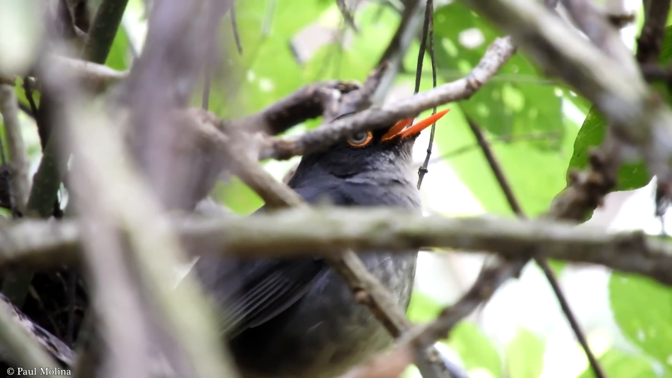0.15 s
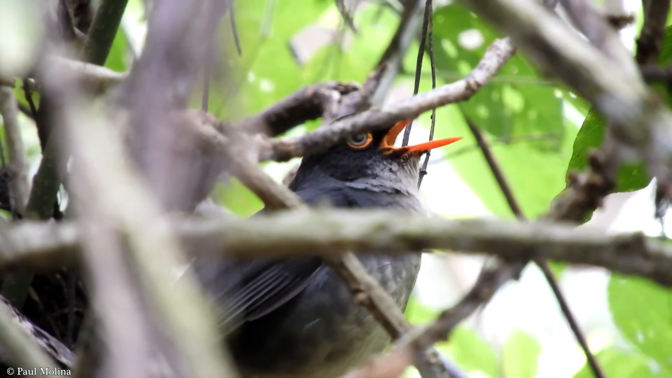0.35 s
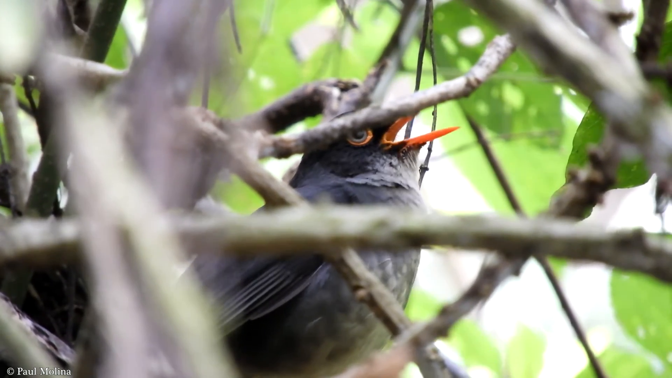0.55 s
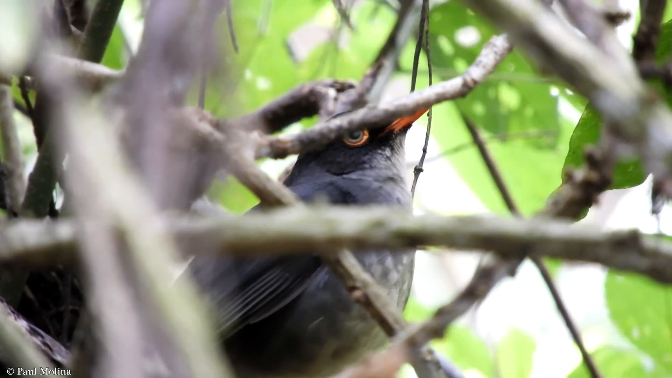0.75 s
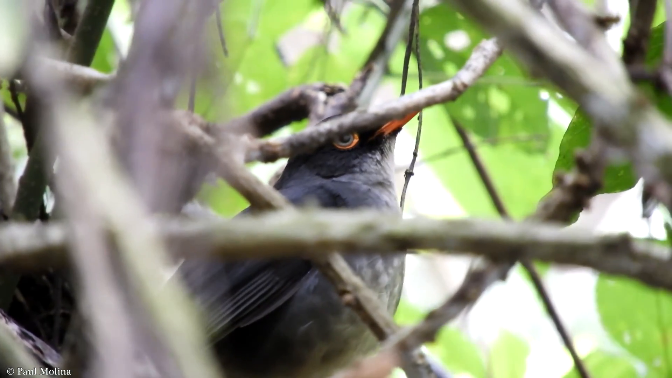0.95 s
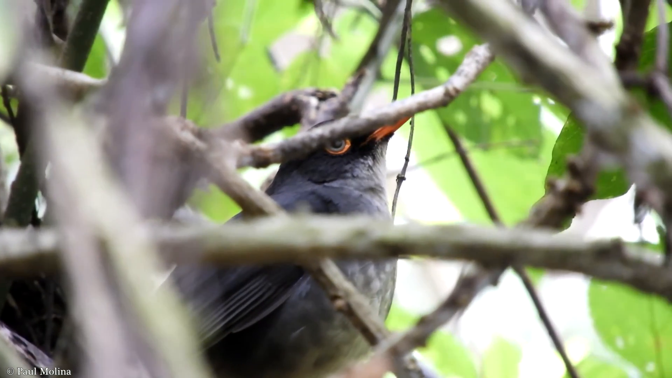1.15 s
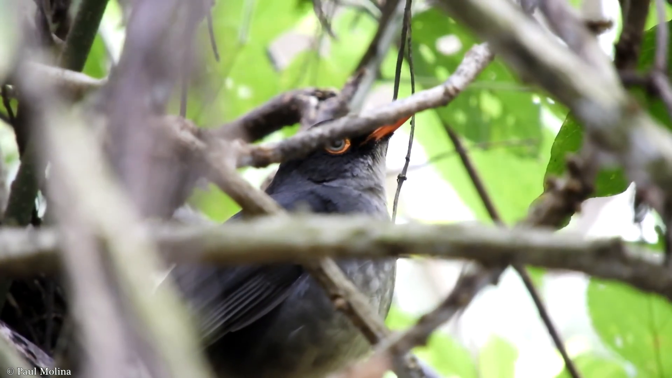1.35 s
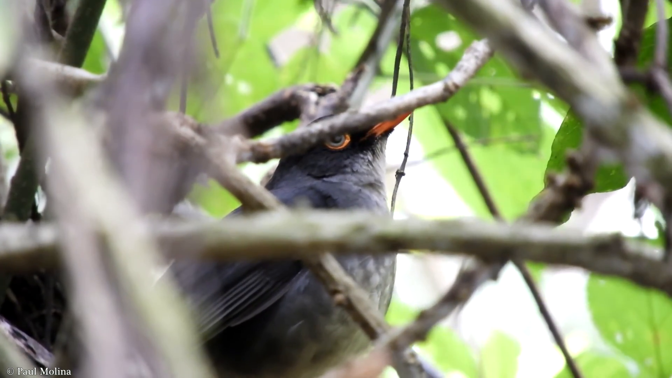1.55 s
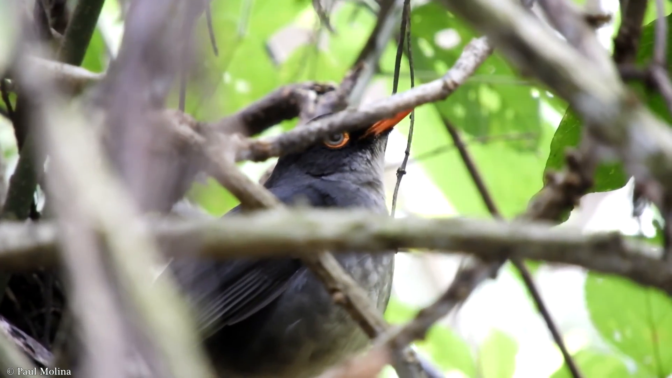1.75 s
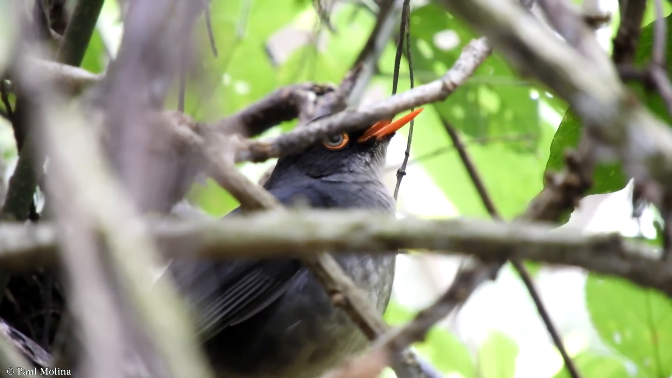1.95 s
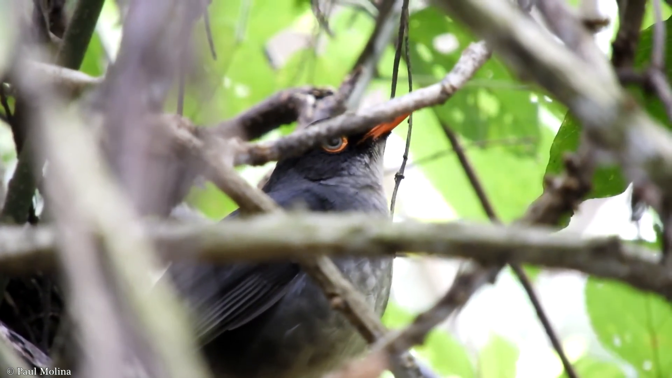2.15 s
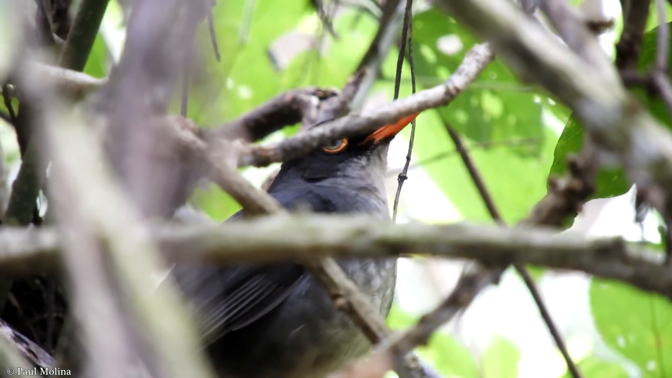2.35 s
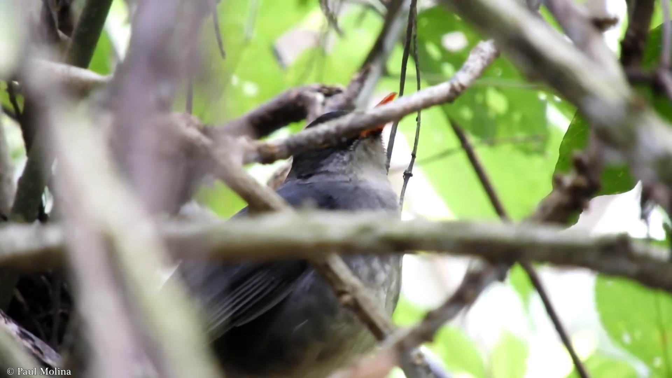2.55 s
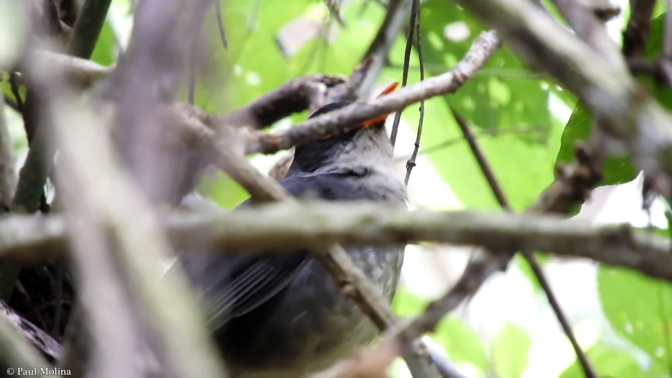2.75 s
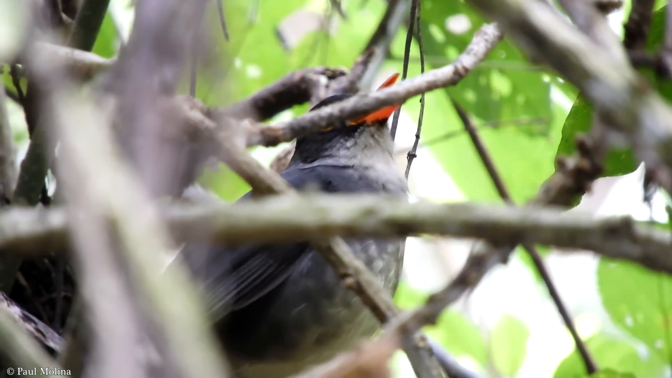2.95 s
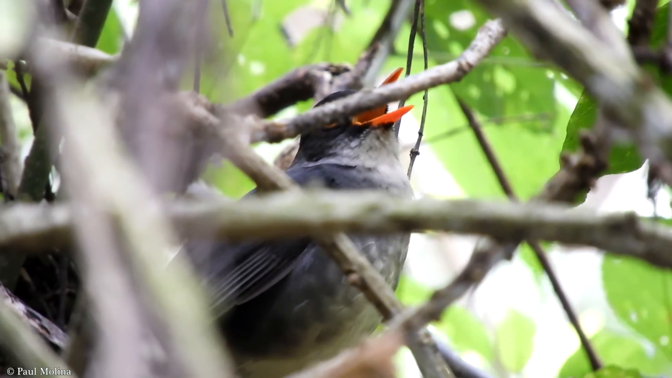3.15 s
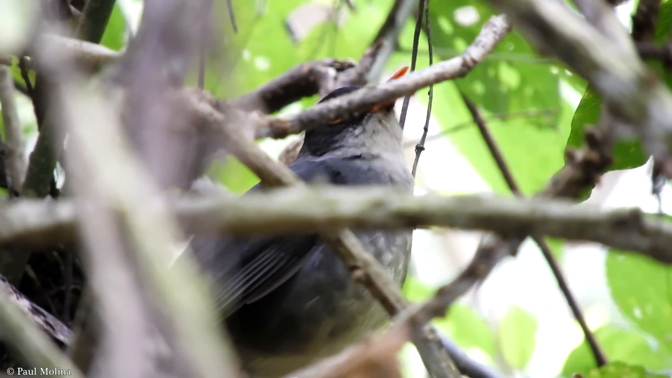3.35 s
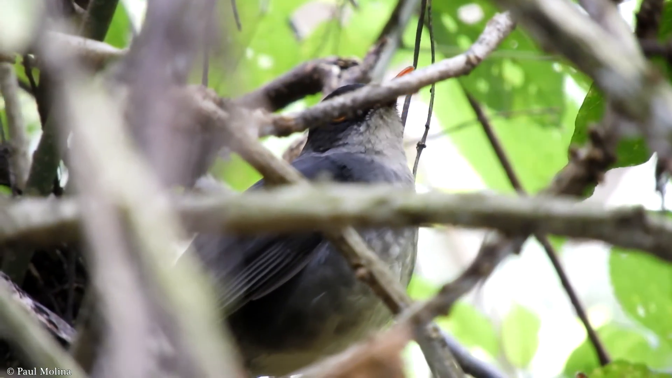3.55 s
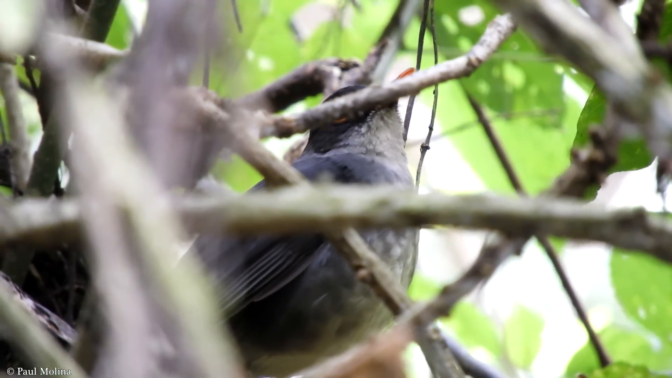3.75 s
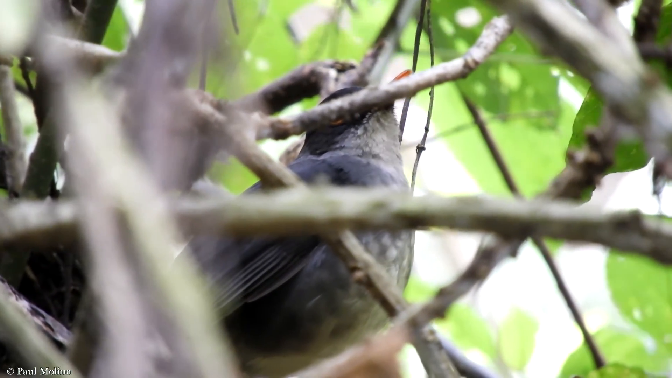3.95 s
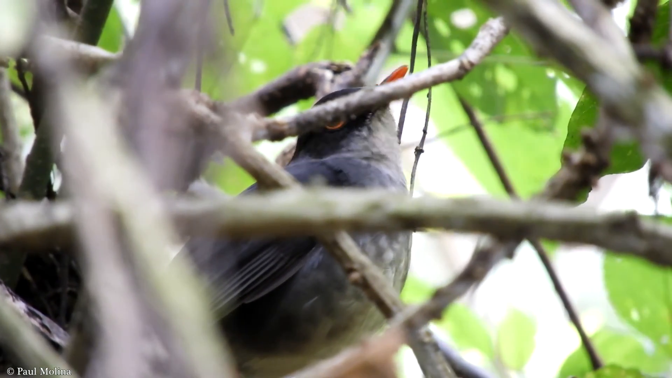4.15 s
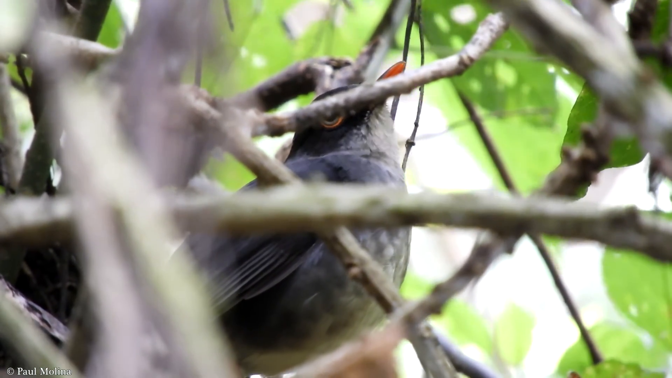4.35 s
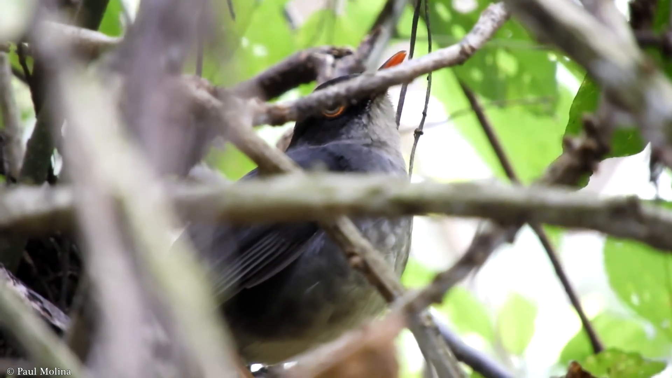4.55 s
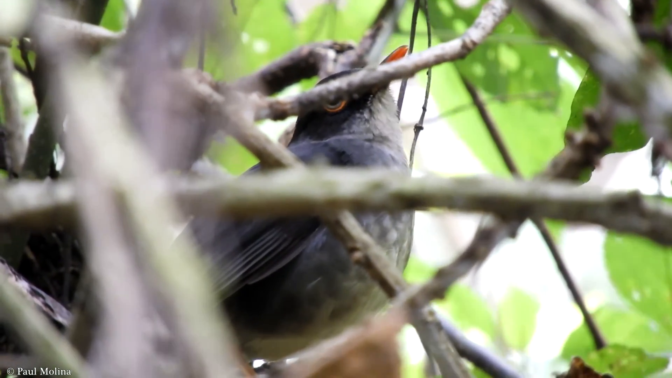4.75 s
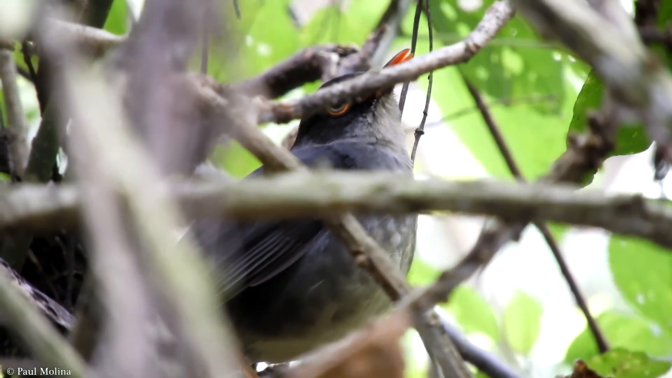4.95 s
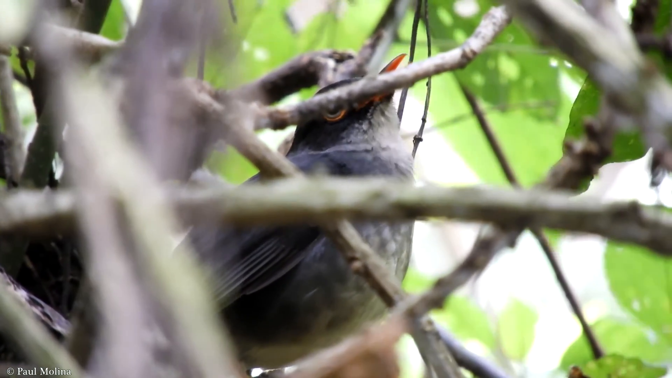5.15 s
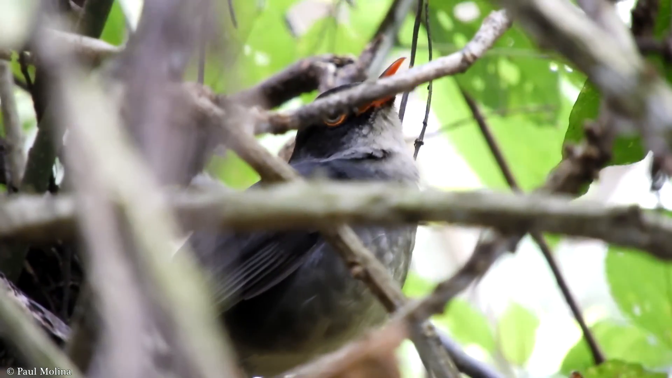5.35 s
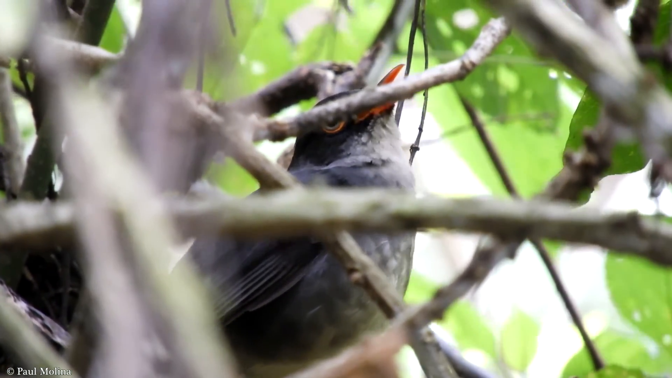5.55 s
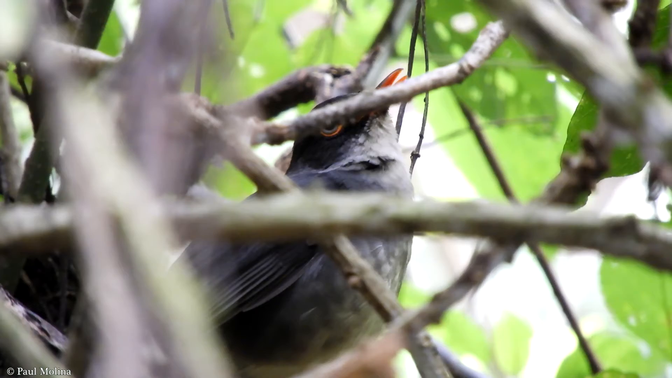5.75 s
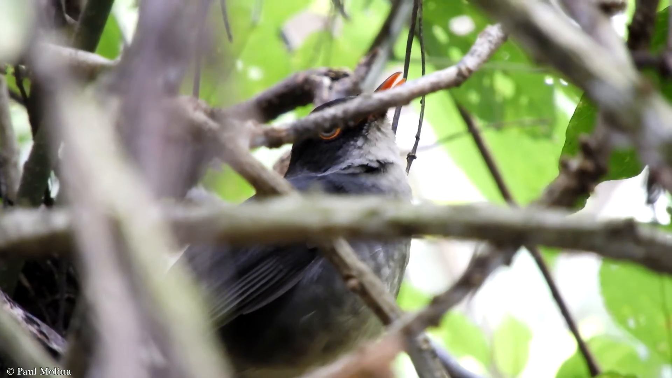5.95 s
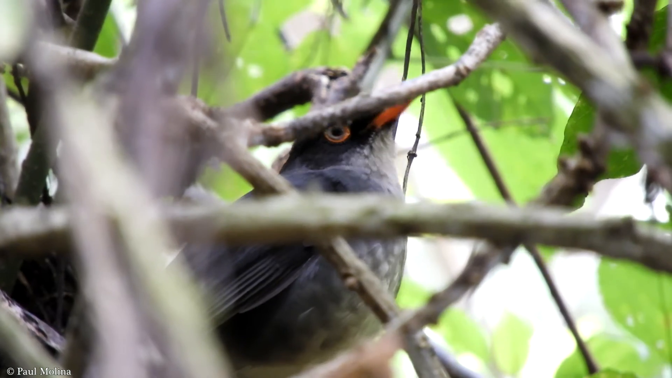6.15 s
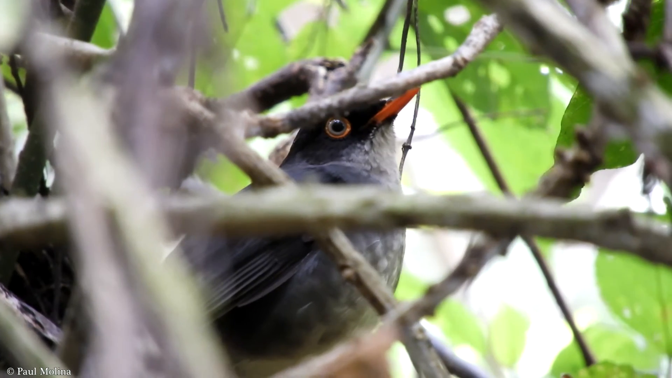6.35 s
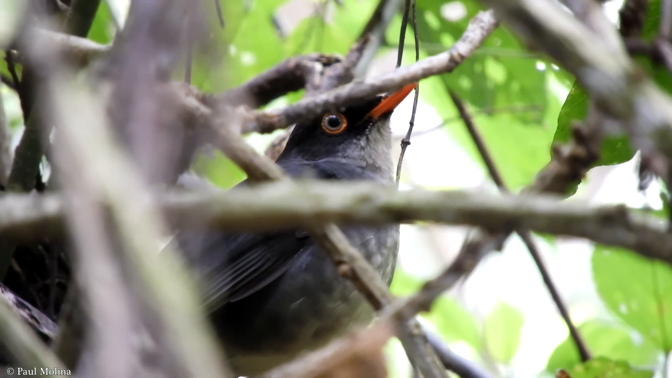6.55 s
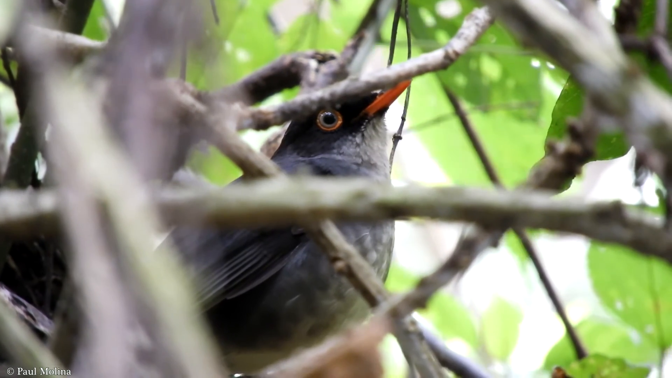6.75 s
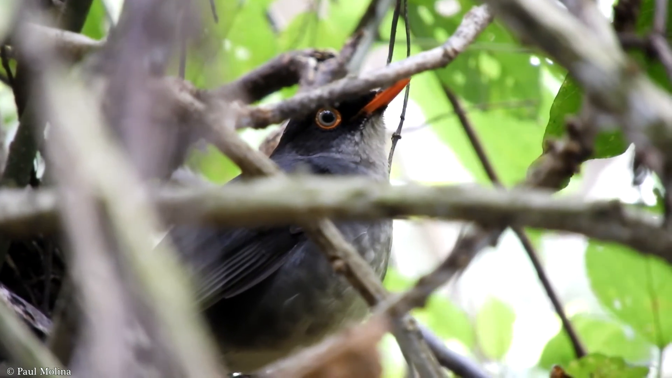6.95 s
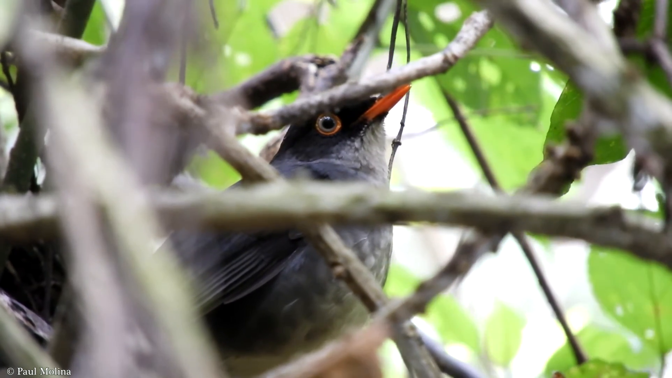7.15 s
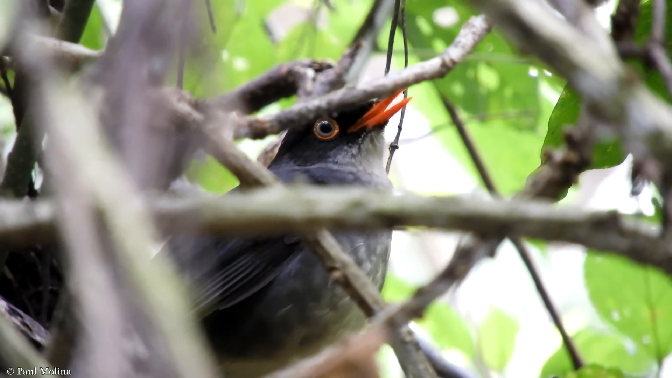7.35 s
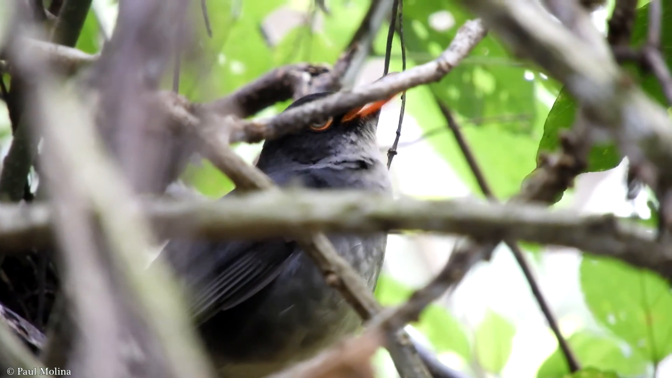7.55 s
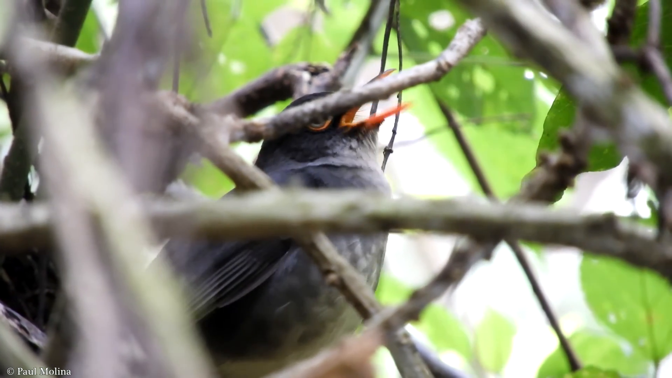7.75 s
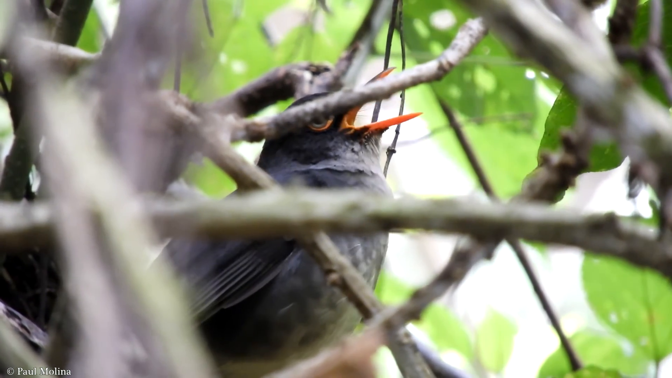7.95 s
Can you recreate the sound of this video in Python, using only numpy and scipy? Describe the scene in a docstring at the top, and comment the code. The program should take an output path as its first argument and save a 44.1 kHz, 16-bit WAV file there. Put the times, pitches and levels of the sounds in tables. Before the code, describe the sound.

Outdoor close recording of one songbird among branches, with short woody echoes and constant hiss. Three similar phrases come several seconds apart: brief pip, two scooping chirps, then a loud clear whistle, surging and dipping. Between them are faint ticks, soft irregular knocks, thin hoarse calls from far birds, and a quiet run of lower, mellow whistles before the last phrase.

```python
"""A thrush sings from a bush close to the microphone: a pip, two rising chirps and a long, nearly pure whistle,
while small birds slur and wheeze deeper in the forest. Dry ticks follow, and dull taps fall throughout.
A second phrase comes, the far birds call again, then soft low notes fill the pause before a third phrase.
Notes are unsteady sines, wheezes and ticks are banded noise, taps are damped rings; noise echoes make the
branches and the forest's tail. Filtered noise makes the low murmur and steady hiss under it all."""
import sys
import numpy as np
from scipy import signal
from scipy.fft import rfft, irfft
from scipy.io import wavfile
from scipy.ndimage import uniform_filter1d, map_coordinates

SR = 44100
rng = np.random.default_rng(int(sys.argv[2]) if len(sys.argv) > 2 else 0)


def persist_wave(psi):
    """Save psi, clipped to +-1, as 16-bit WAV."""
    counts = np.round(np.clip(psi, -1, 1) * 32767).astype(np.int16)
    wavfile.write(sys.argv[1], SR, np.atleast_2d(counts).T)


N = 352359
TIME = np.arange(N) / SR
FREQS = np.maximum(np.fft.rfftfreq(N, 1 / SR), 1)


def undb(db):
    """Decibels to amplitude gain."""
    return 10 ** (np.asarray(db) / 20)


def pan(db):
    """Left and right gains for a left-minus-right level in dB; their mean is one."""
    gains = undb(np.array([np.atleast_1d(db), -np.atleast_1d(db)]) / 2)
    return gains / gains.mean(axis=0)


def over_freq(hz, values):
    """Join points by straight lines on a log-frequency axis."""
    return np.interp(np.log(FREQS), np.log(hz), values)


def walk(rate, size):
    """Smooth chance with a spread of about one, from `rate` random points a second."""
    steps = rng.standard_normal(int(size / SR * rate) + 4)
    return map_coordinates(steps, [np.arange(size) / SR * rate], order=2, mode="nearest")


def add(track, sound, start):
    """Mix a sound into a track from a given second on."""
    i = max(int(start * SR), 0)
    part = track[..., i:i + sound.shape[-1]]
    part += sound[..., :part.shape[-1]]


def gate(t, length, edge):
    """Rounded start and end of a note."""
    nearest_end = np.minimum(t, length - t)
    return np.sin(np.pi / 2 * np.clip(nearest_end / edge, 0, 1)) ** 2


def arch(t, length, ends_db=-4):
    """Level in dB of a note that swells to its middle and fades again."""
    return ends_db * (2 * t / length - 1) ** 2


def ring_down(t, t60):
    """Exponential decay that falls 60 dB in t60 seconds."""
    return np.exp(-np.log(1000) * t / t60)


def syrinx(hz, db, waver, flutter_db, full_db=-29, second_db=-38, third_db=-34.5):
    """A nearly pure tone, a little unsteady; overtones grow as it is blown harder, up to full_db."""
    phase = 2 * np.pi * np.cumsum(hz * (1 + waver * walk(346, len(hz)))) / SR
    size = undb(db + flutter_db * walk(64.7, len(hz)))
    effort = np.minimum(size / undb(full_db), 1)
    overtones = undb(second_db) * np.sin(2 * phase) + undb(third_db) * np.sin(3 * phase)
    below_nyquist = 3 * hz < SR / 2
    return np.sqrt(2) * size * (np.sin(phase) + effort * overtones * below_nyquist)


def tone(start, hz, db, waver, flutter_db, edge):
    """One syrinx note with rounded ends, placed in time."""
    out, t = np.zeros(N), np.arange(len(hz)) / SR
    add(out, gate(t, len(hz) / SR, edge) * syrinx(hz, db, waver, flutter_db), start)
    return out


def whistles(edge_s=0.018, pitch_window_s=0.028):
    """Long thrush whistles: a tone follows a smoothed pitch curve while its loudness surges and dips."""
    # one curve per long whistle: t/s, f/Hz, level/dB before the mix
    curves = [
        [(0.33, 3520, -44), (0.344, 3510, -39), (0.368, 3580, -28.5), (0.39, 3566, -42), (0.405, 3597, -27),
         (0.43, 3600, -20), (0.452, 3598, -24.5), (0.49, 3600, -19.5), (0.527, 3600, -26), (0.548, 3567, -24),
         (0.564, 3593, -22.5), (0.583, 3570, -26.5), (0.62, 3558, -21), (0.636, 3590, -40), (0.645, 3530, -28),
         (0.659, 3510, -44), (0.668, 3500, -36), (0.698, 3492, -26.5), (0.717, 3490, -43), (0.725, 3530, -31),
         (0.74, 3530, -50), (0.77, 3560, -48)],
        [(3.035, 3440, -39), (3.06, 3490, -30.5), (3.069, 3600, -34), (3.08, 3547, -27.5), (3.115, 3570, -23),
         (3.142, 3560, -28.5), (3.167, 3563, -22), (3.187, 3540, -30), (3.204, 3544, -21), (3.224, 3510, -38),
         (3.233, 3500, -30), (3.255, 3530, -31.5), (3.275, 3502, -35.5), (3.325, 3490, -33),
         (3.351, 3490, -21.5), (3.38, 3474, -31.5), (3.425, 3476, -31), (3.455, 3440, -50), (3.485, 3500, -41)],
        [(7.825, 3540, -47), (7.845, 3570, -37), (7.866, 3585, -37), (7.878, 3605, -26.5), (7.932, 3606, -22),
         (7.948, 3610, -25), (7.96, 3580, -22.5), (7.988, 3590, -17)],
    ]
    # among the branches the direction depends on pitch: f/Hz, left minus right level/dB
    direction = [(3520, -3.5), (3585, -7), (3602, 0)]
    out = 0
    for rows in curves:
        when, pitch, db = np.transpose(rows)
        t = np.arange(when[0], when[-1] + edge_s, 1 / SR)
        hz = uniform_filter1d(np.interp(t, when, pitch), int(pitch_window_s * SR), mode="nearest")
        sound = tone(when[0], hz, np.interp(t, when, db), waver=0.002, flutter_db=0.9, edge=edge_s)
        pitch_now = np.interp(TIME, t, hz)
        out = out + sound * pan(np.interp(pitch_now, *np.transpose(direction)))
    return out


def chirps(scoop_s=0.018):
    """Each chirp glides exponentially up to its pitch and throbs as it passes those that carry best."""
    # upward chirps: t/s, length/s, held f/Hz, scoop depth/Hz, level/dB before carry and mix
    chirp_notes = [(0.069, 0.07, 3003, 470, -33), (0.154, 0.077, 2993, 576, -32),
                   (2.785, 0.083, 3034, 736, -33), (2.88, 0.082, 2990, 650, -29.5),
                   (7.562, 0.073, 3006, 620, -31), (7.65, 0.089, 2974, 717, -29)]
    # how well each pitch carries through the branches: f/Hz, gain/dB
    carry = [(2450, -6.5), (2720, -11), (2840, 1.5), (2905, -10), (2965, 2), (3040, -1.5)]
    out = 0
    for start, length, held_hz, scoop_hz, db in chirp_notes:
        t = np.arange(int(length * SR)) / SR
        hz = held_hz - scoop_hz * np.exp(-t / scoop_s)
        level = db + np.interp(hz, *np.transpose(carry))
        out = out + tone(start, hz, level, waver=0.0032, flutter_db=0.9, edge=0.0072)
    return out


def pips():
    """A short, nearly even-pitched syrinx note opens each phrase before the chirps."""
    # opening notes: t/s, length/s, f/Hz, level/dB before the mix
    pip_notes = [(0.023, 0.033, 3090, -36), (2.746, 0.026, 3120, -36), (7.496, 0.068, 3010, -44.5)]
    out = 0
    for start, length, hz, db in pip_notes:
        steady_hz = np.full(int(length * SR), float(hz))
        out = out + tone(start, steady_hz, db, waver=0.0033, flutter_db=5.5, edge=0.01)
    return out


def soft_notes(settle_s=0.0316):
    """Quiet low whistles, beak nearly shut, that ease onto a steady pitch; some grow and some fade."""
    # soft notes: t/s, length/s, starting f/Hz, settled f/Hz, mid-note level/dB, growth over the note/dB
    low_notes = [(5.17, 0.041, 2850, 2710, -49, 0), (5.317, 0.201, 2660, 2640, -41, 3),
                 (5.517, 0.06, 2660, 2620, -43.5, 0), (5.577, 0.034, 2680, 2630, -41, 2),
                 (5.609, 0.057, 2705, 2750, -42.5, -3), (5.725, 0.14, 2340, 2200, -42.5, -5),
                 (5.974, 0.11, 2220, 2220, -44, -6)]
    out = 0
    for start, length, from_hz, held_hz, db, growth_db in low_notes:
        t = np.arange(int(length * SR)) / SR
        hz = held_hz + (from_hz - held_hz) * np.exp(-t / settle_s)
        level = db + arch(t, length) + growth_db * (t / length - 0.5)
        out = out + tone(start, hz, level, waver=0.0025, flutter_db=2.5, edge=0.0077)
    return out


def slurs():
    """Small birds' thin tones, each sliding evenly from one pitch to another."""
    # thin slurs: t/s, length/s, starting f/Hz, final f/Hz, mid-note level/dB before the mix
    slur_notes = [(0.56, 0.2, 8550, 9820, -49.5), (0.63, 0.11, 4715, 4225, -46.5),
                  (4.515, 0.055, 4660, 4280, -49)]
    out = 0
    for start, length, from_hz, to_hz, db in slur_notes:
        t = np.arange(int(length * SR)) / SR
        hz = from_hz * (to_hz / from_hz) ** (t / length)
        out = out + tone(start, hz, db + arch(t, length), waver=0.0021, flutter_db=4.5, edge=0.008)
    return out


def wheezes(width_hz=600):
    """Hoarse distant calls: a narrow band of breathy sound slides downward."""
    # falling wheezes: t/s, length/s, starting f/Hz, final f/Hz, mid-note level/dB before the mix
    hoarse_calls = [(0.51, 0.12, 5950, 4600, -49), (4.365, 0.12, 6000, 4700, -47),
                    (4.455, 0.165, 4950, 4000, -54)]
    out = np.zeros(N)
    for start, length, from_hz, to_hz, db in hoarse_calls:
        t = np.arange(int(length * SR)) / SR
        hz = from_hz * (to_hz / from_hz) ** (t / length)
        phase = 2 * np.pi * np.cumsum(hz) / SR
        # two random envelopes a quarter turn apart spread the tone into a band
        rasp = walk(width_hz, len(t)) * np.sin(phase) + walk(width_hz, len(t)) * np.cos(phase)
        add(out, undb(db + arch(t, length)) * gate(t, length, 0.0075) * rasp, start)
    return out


def taps(t60=0.091, rise_s=0.0012, faint_db=-44, count=36):
    """Soft knocks, each a short damped ring of unsteady pitch; fainter ones fall at random."""
    # dull taps among the trees: t/s, f/Hz, level/dB before rise and decay
    clear = [(1.279, 229, -36), (3.386, 775, -33), (4.83, 221, -36.5), (5.119, 953, -39), (5.80, 803, -38),
             (6.37, 855, -39), (7.095, 908, -32.5), (7.56, 592, -37)]
    faint = []
    for when, pitch, size in rng.random((count, 3)):
        faint.append((when * N / SR, 550 + 500 * pitch, faint_db + 5 * size))
    out, t = np.zeros(N), np.arange(SR // 2) / SR
    envelope = (1 - np.exp(-t / rise_s)) * ring_down(t, t60)
    for start, hz, db in clear + faint:
        phase = 2 * np.pi * np.cumsum(hz * (1 + 0.036 * walk(173, len(t)))) / SR
        add(out, undb(db) * np.sin(phase) * envelope, start)
    return out


def ticks(rise_s=0.002, decay_s=0.0064):
    """Faint dry ticks in the foliage, each a short noise burst in one band."""
    # dry ticks: t/s, centre f/Hz, level/dB before rise and decay
    bursts = [(1.22, 3050, -37), (1.459, 6700, -35), (1.835, 3750, -36)]
    out, t = np.zeros(N), np.arange(SR // 20) / SR
    envelope = (1 - np.exp(-t / rise_s)) * np.exp(-t / decay_s)
    for start, hz, db in bursts:
        band = signal.butter(2, [0.85 * hz, 1.15 * hz], "band", fs=SR, output="sos")
        grain = signal.sosfilt(band, rng.standard_normal(len(t)))
        add(out, undb(db) * grain / grain.std() * envelope, start)
    return out


def scatter(sound, t60, wet_db, likeness=0.67):
    """Dense decaying echoes off wood and leaves, partly the same left and right."""
    t = np.arange(SR) / SR
    mid, side = rng.standard_normal((2, SR))
    alike = np.clip(likeness, 0, 1)
    tail = np.sqrt(1 + alike) * mid + np.sqrt(1 - alike) * side * np.array([[1], [-1]])
    tail = tail * ring_down(t, t60) * (t > 0.004)  # no echo in the first 4 ms
    tail = tail / np.sqrt(np.sum(tail ** 2) / 2)
    return undb(wet_db) * signal.fftconvolve(np.atleast_2d(sound), tail, axes=1)[:, :N]


def air(spectrum, db, swell_db, flicker_db):
    """A steady bed of shaped noise whose bands swell together and, all but the top, flicker alone."""
    # stereo image of the bed: f/Hz, left-right correlation, left minus right level/dB
    image = [(59.3, 0.82, -6), (300, 0.75, -6), (700, 0.92, -2), (1500, 0.9, -0.5), (3400, .88, -0.5),
             (4470, 0.71, -4), (7000, 0.27, -4), (8850, 0.14, -1.5)]
    hz, alike, pan_db = np.transpose(image)
    alike = np.clip(over_freq(hz, alike), 0, 1)
    mid, side = rfft(rng.standard_normal((2, N)))
    both = np.sqrt(1 + alike) * mid + np.sqrt(1 - alike) * side * np.array([[1], [-1]])
    both = both / np.sqrt(1 + alike) * pan(over_freq(hz, pan_db))
    both = both * undb(over_freq(*np.transpose(spectrum)))
    rest, out = irfft(both, N), 0
    swell = swell_db * walk(3.077, N)
    for edge_hz in 250 * 2 ** np.arange(6):  # peel off bands from the bottom up
        band = signal.sosfiltfilt(signal.butter(2, edge_hz, fs=SR, output="sos"), rest)
        out = out + band * undb(swell + flicker_db * walk(16, N))
        rest = rest - band
    out = out + rest * undb(swell)
    return out * undb(db) / out.mean(axis=0).std()


def murmur():
    """The forest's low murmur, as shaped noise."""
    # murmur spectrum: f/Hz, relative level per Hz/dB
    low_spectrum = [(15, -41), (25, -9), (43, -3.5), (76, 2), (162, -1), (234, -4), (317, -11), (384, -7.5),
                    (531, -5.5), (655, -1.5), (749, -3.5), (906, -3.5), (1020, -5.5), (1670, -4.5),
                    (2400, -8.5), (3120, -18.5), (5280, -120)]
    return air(low_spectrum, -46, swell_db=0.47, flicker_db=2.0)


def hiss():
    """The microphone's steady hiss, as shaped noise."""
    # hiss spectrum: f/Hz, relative level per Hz/dB
    high_spectrum = [(1410, -57), (2400, -6.5), (2880, 0.5), (4160, -0.5), (5090, -0.5), (6840, -2),
                     (8590, 1), (9300, -1.5), (11500, -18.5), (14900, -34), (22000, -120)]
    return air(high_spectrum, -42.5, swell_db=0.63, flicker_db=1.7)


def scene():
    """The thrush close by, the small birds deeper in the forest, and the air around them."""
    whistle = undb(0.8) * whistles()
    chirp = undb(-3.0) * (pips() + chirps()) * pan(-3.5)
    soft = soft_notes() * pan(-4.0)
    small_birds = slurs() * pan(-0.5) + wheezes() * pan(-1.7)
    knocks = (taps() + ticks()) * pan(-3.5)
    branches = scatter(chirp, t60=0.32, wet_db=-11) + scatter(soft, t60=0.35, wet_db=-12)
    add(branches, undb(-12) * chirp, 0.02)  # a trunk close by throws pips and chirps back after 20 ms
    forest = scatter(whistle + chirp + soft + knocks, t60=0.42, wet_db=-17)
    far = undb(-1.0) * small_birds + scatter(small_birds, t60=0.24, wet_db=-3.5)
    bed = murmur() + hiss()
    return whistle + chirp + soft + knocks + branches + forest + far + bed


def record(dry):
    """The recorder cuts the top: a steep low-pass at 15.6 kHz."""
    return signal.sosfilt(signal.ellip(8, 0.2, 70, 15600, fs=SR, output="sos"), dry)


dry = scene()
out = record(dry)
persist_wave(out)
```